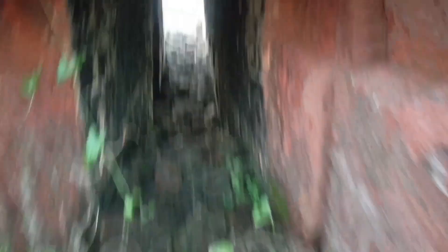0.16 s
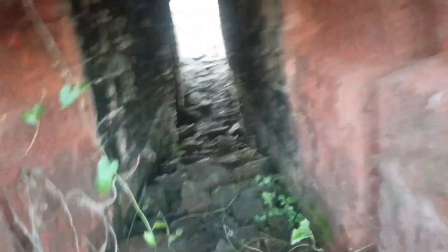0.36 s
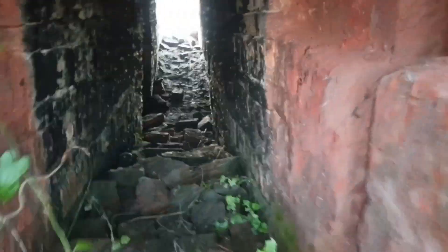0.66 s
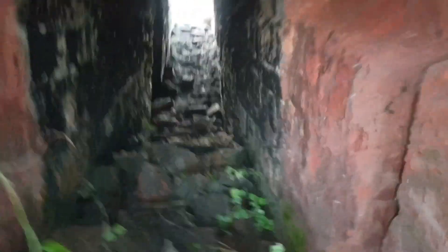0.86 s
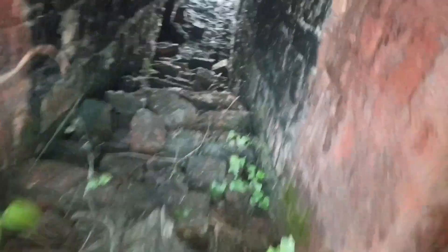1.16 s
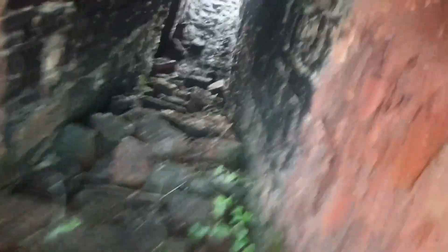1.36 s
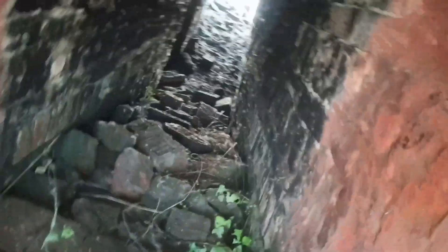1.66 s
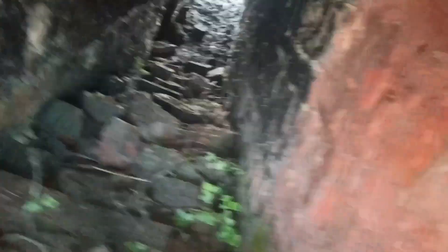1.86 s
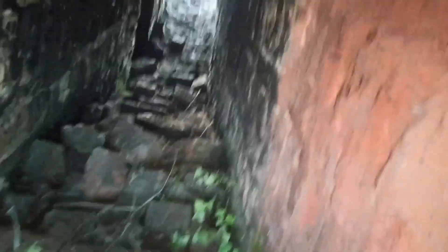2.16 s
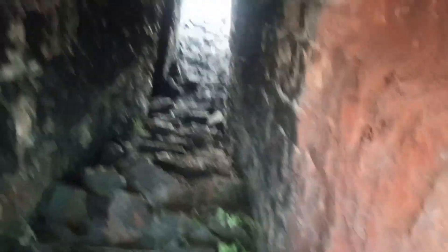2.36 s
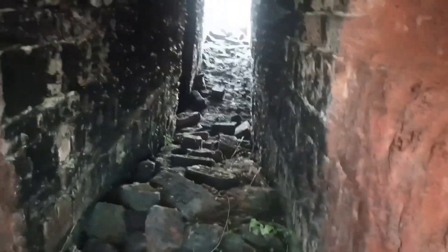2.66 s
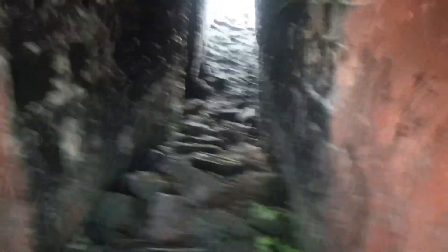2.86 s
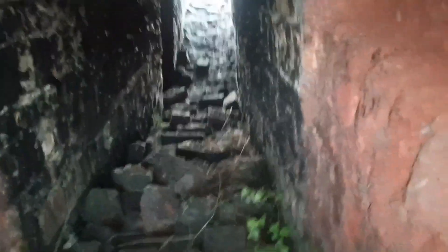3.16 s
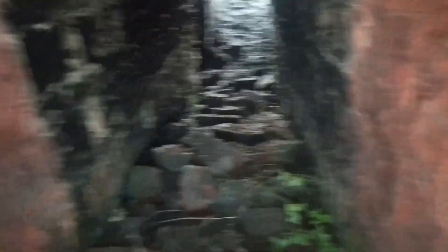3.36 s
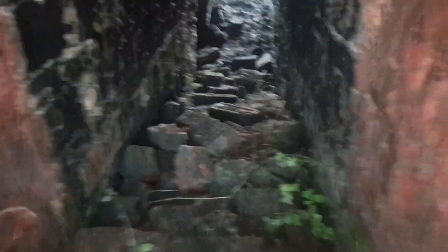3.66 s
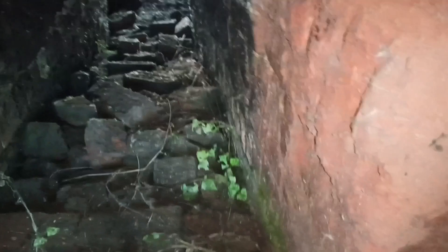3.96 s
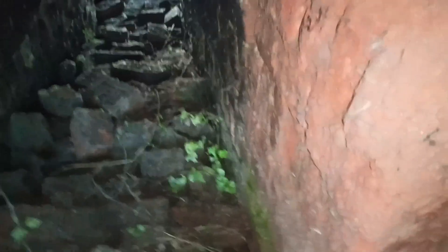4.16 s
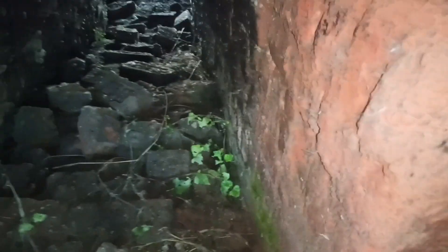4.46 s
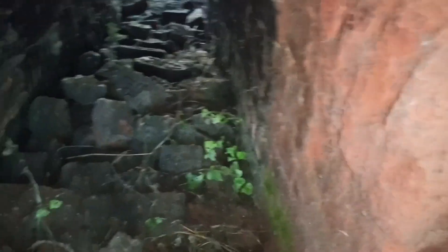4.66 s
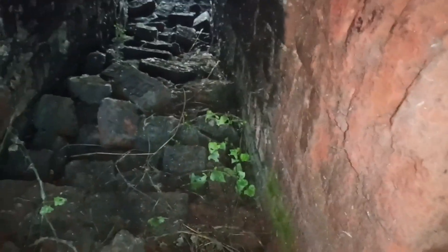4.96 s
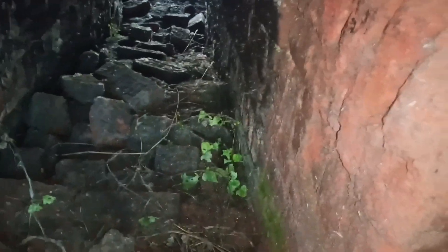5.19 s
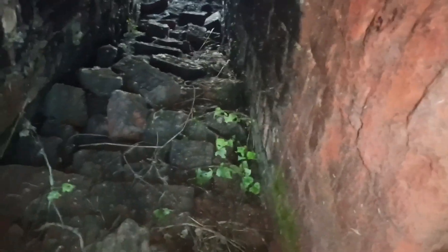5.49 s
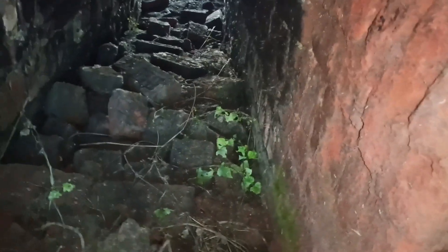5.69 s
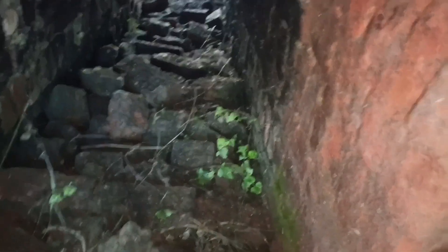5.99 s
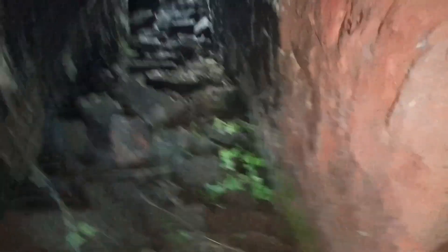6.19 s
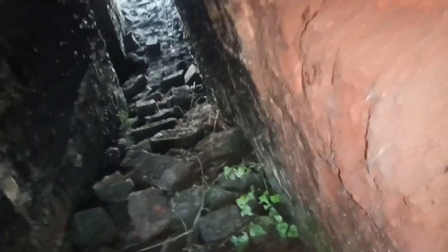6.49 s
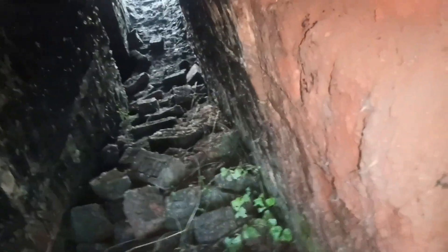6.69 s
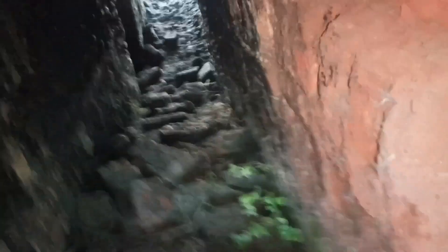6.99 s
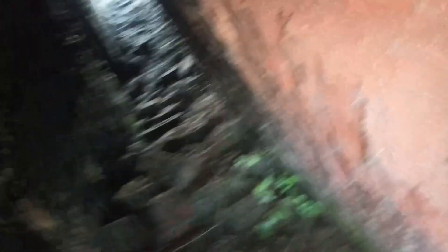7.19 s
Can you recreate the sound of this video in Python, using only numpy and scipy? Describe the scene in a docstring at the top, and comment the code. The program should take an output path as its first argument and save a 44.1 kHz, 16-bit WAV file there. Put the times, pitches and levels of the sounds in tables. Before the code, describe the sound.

Close, dry rustling of stems opens with a very loud bump on the microphone, then drops to near quiet with small ticks and two more knocks. A clacking thud and strong swishes come around three seconds, then steady rustling with many crisp twig snaps. Another cluster of hard knocks rattles the microphone near the end, before a last swelling scrape. Narrow brick and stone passage, handheld microphone, little echo.

```python
"""Squeezing through dry stems

Someone edges through dry stems in a narrow brick passage, holding a camera with one microphone.
Stems drag and rustle as grainy noise and twigs snap as short noise bursts. Something hard knocks
close to the microphone: a swing of pressure and a ringing casing. Thuds and woody knocks sound as
decaying modes. Filtered-noise rumble, shuffle and hiss and a faint wavering hum lie under it all;
a faint airy tone and a brief squeak come later."""
import sys
import numpy as np
from scipy import signal
from scipy.fft import rfft, irfft, next_fast_len
from scipy.io import wavfile
from scipy.ndimage import uniform_filter1d, map_coordinates

SR = 44100
rng = np.random.default_rng(int(sys.argv[2]) if len(sys.argv) > 2 else 0)


def transcribe(signal):
    """Save signal, clipped to [-1, 1], as a 16-bit WAV file at the path in sys.argv[1]."""
    frames = np.atleast_2d(signal).T
    limited = np.clip(frames, -1, 1)
    pcm = np.round(limited * 32767).astype(np.int16)
    wavfile.write(sys.argv[1], SR, pcm)


N = 323694

# Body and ground movement: t/s, rumble level/dB, shuffle level above the rumble/dB
BODY_MOVEMENT = [(0, -56, -6), (0.26, -41.5, -4.5), (0.45, -61, -10), (1.37, -63, -9), (1.74, -73, -7.5),
                 (1.92, -61, -11), (2.29, -58.5, -8.5), (2.76, -46, -3), (3.07, -62.5, -8.5),
                 (3.27, -62, -5), (3.51, -41.5, -6), (3.64, -50.5, -1), (4.09, -52, -9.5),
                 (4.5, -51.5, -3.5), (4.78, -52, -8), (6.11, -54.5, -3), (6.48, -51.5, -7), (6.66, -52, 1),
                 (7.05, -42.5, -5), (7.22, -49.5, 6), (7.34, -38, -2)]
# Noise spectra: f/Hz, level/dB per Hz, relative
RUMBLE_SPECTRUM = [(15, -44), (25, -20.5), (38, -12), (70, 6), (103, -2.5), (180, -9), (230, -34.5),
                   (400, -120)]
SHUFFLE_SPECTRUM = [(110, -35.5), (180, -7), (205, -1.5), (269, -3), (334, -4), (382, -6), (528, -10.5),
                    (729, -7.5), (1000, -16.5), (1300, -47), (2200, -120)]
# Steady hiss of the still air and microphone: f/Hz, level/dB per Hz, relative
AIR_SPECTRUM = [(500, -7.5), (1300, 2.5), (15700, -16.5)]

# Faint hum that swells with the background: t/s, level/dB
HUM_LEVEL = [(0, -87), (1.5, -89), (1.7, -96), (2.6, -79.5), (3.2, -92), (3.6, -72), (7.34, -80.5)]
# Fuzzy lines of the hum: f/Hz, waver/Hz, level above the hum level/dB
HUM_LINES = [(266, 22, 10.5), (374.4, 14, 8), (1103, 4.4, 4)]

# Stems dragged past, one row a stroke: t at full strength/s, rustle level/dB, rise/s, hold/s, fall/s,
# coarse scrape above the rustle/dB, fine fizz above the rustle/dB; rise and fall each span 20 dB
STEM_STROKES = [(0.07, -47.5, .15, 0.073, .2, -4.5, -1.5), (0.231, -35.5, 0.12, 0.0055, 0.091, -2, 0.5),
                (0.37, -52.5, 0.25, 0.013, .1, -6.5, -2), (1.111, -54.5, 0.056, 0.0094, 0.12, -3, -5.5),
                (1.21, -65.5, .02, .06, 0.11, 2, -4), (1.39, -73.5, 0.047, 0.076, .1, 4.5, -3),
                (1.95, -58, 0.12, 0.0087, 0.14, -3, -6), (2.249, -54.5, 0.028, 0.0084, 0.063, -9, -10),
                (2.379, -54, .11, 0.017, 0.21, -3.5, -5), (2.576, -44.5, 0.19, .01, 0.21, -4, -1.5),
                (2.755, -29.5, 0.081, 0.012, 0.041, -5, -2), (2.905, -39.5, .16, 0.008, 0.036, -3, -4),
                (2.965, -52.5, .1, 0.013, 0.025, -3.5, -7), (3.346, -44, 0.11, 0.039, .3, -7.5, -3),
                (3.519, -29, 0.13, .01, 0.14, -5, -3), (3.666, -33.5, 0.24, 0.071, 0.19, -5, -2.5),
                (3.9, -46.5, 0.32, 0.068, 0.1, -2, -3.5), (4.25, -46.5, 0.11, 0.013, 0.021, -1, -10),
                (4.312, -51.5, 0.033, 0.062, .1, -0.5, -4), (4.398, -29.5, 0.053, 0.013, 0.029, -12, -9.5),
                (4.586, -36, 0.13, .04, 0.13, -9.5, -4.5), (4.674, -34, 0.068, 0.036, 0.14, -11.5, -4),
                (4.973, -46, .18, 0.015, 0.24, -7.5, -1), (5.088, -38.5, 0.16, .01, 0.054, -8.5, -2.5),
                (5.16, -39.5, 0.11, 0.0094, 0.12, -6, -1), (5.324, -37.5, 0.13, 0.1, 0.096, -8.5, -0.5),
                (5.793, -40.5, 0.42, .01, 0.51, -5.5, 0.5), (6.06, -35, 0.16, 0.088, .15, -6, -1.5),
                (6.209, -40, .1, 0.0096, 0.079, -5.5, -1.5), (6.425, -39, 0.26, 0.012, 0.38, -7.5, -3.5),
                (6.971, -40, 0.037, 0.027, 0.17, 1.5, -8.5), (7.03, -36.5, 0.085, 0.016, .15, 2.5, -4.5),
                (7.252, -32.5, 0.36, .1, .1, -2, -8)]
# Light contact between the strokes: t/s, rustle level/dB, coarse scrape and fine fizz above it/dB
LIGHT_CONTACT = [(0, -58.5, -6, 3.5), (0.5, -68, 1.5, -1), (0.744, -70, -4.5, 0), (0.872, -64, -4, -2.5),
                 (1.01, -70, -5.5, 0), (1.3, -66, 4.5, -1.5), (1.36, -74.5, 2, -0.5),
                 (1.55, -69, -1.5, -4.5), (1.61, -78, -18, -4), (1.8, -68, -8, -5.5), (2.15, -68, -4, -6),
                 (2.9, -60, -8, 1), (3.16, -78, 2, -9), (3.9, -52.5, -5.5, -7.5), (4.5, -51, -3.5, 0),
                 (4.85, -64, 5, -7), (5.5, -49, -6, 1), (6.3, -55.5, -3.5, -23), (6.75, -56.5, 3, 0),
                 (7.34, -52, 2, -5)]
# Twig snaps: t/s, level/dB, thinness/dB (thin twigs lose wood and gain fizz)
TWIG_SNAPS = [(0.0185, -41, -9.5), (0.214, -38, 8), (0.348, -36.5, 6), (0.3956, -36.5, -0.5),
              (0.4774, -63, -9), (0.5444, -51.5, -1), (0.9385, -52, 1), (1.0267, -58, 10),
              (1.0935, -34, -6), (1.129, -58, -1), (1.206, -60, -13.5), (1.323, -55, 6), (1.6327, -59.5, 5),
              (1.708, -60.5, -3), (1.783, -54.5, -3), (1.942, -45, -1), (1.999, -42.5, 2), (2.0178, -51, 0),
              (2.103, -48, 2.5), (2.144, -48.5, -1), (2.8636, -41, -12), (2.8978, -29, -2),
              (2.9156, -27.5, 4), (3.151, -54.5, -2), (3.735, -20.5, -5), (3.986, -26, -2.5),
              (4.0326, -31.5, -2), (4.169, -36, -3), (4.293, -31, 1), (4.315, -33, 4), (4.399, -28.5, 6),
              (4.5716, -22.5, 8.5), (4.5472, -34.5, 8.5), (4.595, -28.5, 8), (4.8989, -36.5, 6),
              (4.9813, -29, 4.5), (5.0975, -36.5, -13), (5.1405, -28.5, 10), (5.1605, -24.5, 3.5),
              (5.314, -27.5, 2), (5.413, -21, 5), (5.623, -34.5, 15), (5.7524, -29, 11.5),
              (6.0502, -27.5, 4), (6.195, -24.5, 6.5), (6.378, -31.5, 4), (6.6081, -38, 1),
              (6.718, -36, -5), (6.7353, -39.5, 3.5), (6.756, -33.5, -10.5), (6.788, -38, 9),
              (6.793, -37.5, 15), (6.8513, -42, -12), (6.984, -49, -15), (7.032, -36, -14), (7.246, -28, 0)]
# Spectra of the three stem sizes: f/Hz, level/dB per Hz, relative
RUSTLE_SPECTRUM = [(2120, -37.5), (3600, -16.5), (4160, -13.5), (5130, -7.5), (5570, -2.5), (6000, -2),
                   (7210, -7), (9200, -17.5), (12000, -37.5), (20200, -120)]
SCRAPE_SPECTRUM = [(530, -40), (900, -14.5), (1250, -10.5), (1430, -11), (1530, -8.5), (1830, -4.5),
                   (2050, -3), (3100, -9.5), (3600, -12), (4680, -3.5), (7920, -120)]
FIZZ_SPECTRUM = [(5410, -34.5), (9200, -8.5), (10200, -5.5), (11300, 3.5), (12400, 3), (13500, 4),
                 (15700, -2)]
SNAP_RISE_S, SNAP_T60_S = 0.00078, .032
WOOD_DB, FINE_DB = -4.5, -6.5  # woody and fine parts of a snap above its rustle, before thinness

# Hard knocks: t/s, swing level/dB, swing f/Hz, click level/dB, click brightness/dB per octave
HARD_KNOCKS = [(0.376, -55, 900, -36, -1.5), (0.3802, -3, 527, -14, -0.5), (1.2849, -12.5, 569, -24, -8),
               (1.4995, -14.5, 560, -26, -8.5), (1.513, -25, 500, -61, -18), (2.3325, -29.5, 470, -45.5, 2),
               (2.339, -19, 443, -52.5, -12), (2.8438, -44, 900, -26.5, -2.5), (2.9569, -43, 795, -32.5, 0),
               (3.0883, -54, 705, -57.5, -11), (6.644, -14, 560, -11.5, 0), (6.6486, -12, 367, -26.5, -4.5),
               (6.686, -37, 680, -31, -6), (6.711, -32, 676, -24.5, -2.5), (6.7418, -46, 800, -22, 0.5),
               (6.7982, -17, 315, -27, -4), (6.8357, -54, 787, -31, 1.5), (6.8477, -58, 793, -31, 0.5),
               (6.8603, -62, 800, -33, -3)]
# Modes of the casing: f/Hz, level/dB, t60/s
CASING_MODES = [(1750, 5.5, 0.0027), (2920, 9, 0.0028), (3600, -7, 0.00294), (6550, 5.5, 0.0028),
                (10000, -3.5, 0.0039), (13300, 4.5, 0.0026)]
CASING_DETUNE = .03  # spread of mode pitch from knock to knock, as a fraction
CLICK_RISE_S, REBOUND_T60_S = .00015, .026

# Thuds and woody knocks, dull boom and clacking ring:
# t/s, boom level/dB, clack level/dB, hardness/dB per octave, boom t60/s
THUDS_AND_WOODY_KNOCKS = [(1.125, -55, -43.5, 5, 0.12), (1.887, -43, -74, -10, 0.11),
                          (1.922, -45.5, -56.5, -16, 0.063), (2.235, -49, -56, -14, 0.093),
                          (2.527, -49.5, -55, 1, 0.13), (2.86, -14.5, -16.5, -6, 0.086),
                          (2.917, -34.5, -45, -8, 0.094), (3.064, -46.5, -55, 4.5, 0.066),
                          (3.47, -37.5, -48, -5, 0.062), (3.565, -34, -47.0, -8, 0.04),
                          (3.737, -35, -28.5, 15, 0.081), (3.838, -28, -44.5, -18, 0.072),
                          (4.137, -56, -70, -3, 0.15), (4.571, -29, -23, 15, 0.049),
                          (5.098, -36, -30.5, 13, 0.047), (6.652, -45, -50, -1, .3),
                          (6.992, -38.5, -30, -4.5, 0.047), (7.18, -33, -35, -4, 0.055),
                          (7.247, -30, -34, -3, 0.097)]
# Modes of the dull boom: f/Hz, level/dB
BOOM_MODES = [(108, 8), (163, 5), (275, 1.5)]
# Modes of the clacking ring: f/Hz, level/dB
CLACK_MODES = [(415, 0.5), (570, 2.5), (790, 5), (1100, -2), (1550, -6), (2100, -8.5)]
STRIKE_DETUNE = .025  # spread of boom and clack pitch from strike to strike, as a fraction

# Faint airy tone that wavers: t/s, f/Hz, level/dB
AIRY_TONE = [(3.95, 800, -82.5), (4.3, 800, -58), (4.45, 760, -73), (4.62, 786, -57), (4.75, 722, -61),
             (5.0, 745, -71), (5.22, 707, -63.5), (5.5, 744, -61), (5.7, 740, -92)]
# A stem squeaks as it slides: t/s, f/Hz, level/dB
STEM_SQUEAK = [(4.66, 5600, -98), (4.69, 5463, -44), (4.71, 5460, -33.5), (4.725, 5470, -43),
               (4.75, 5620, -43), (4.78, 5600, -75)]

BAND_LIMIT_HZ, BASS_CORNER_HZ = 15750, 45


def amp(db):
    """dB to gain."""
    return 10 ** (np.asarray(db) / 20)


def unit(x):
    """x at rms 1."""
    return x / np.sqrt(np.mean(x ** 2, axis=-1, keepdims=True) + 1e-20)


def curves(rows):
    """One value per sample for each column after the time."""
    times, *columns = np.transpose(rows)
    return [np.interp(np.arange(N) / SR, times, column) for column in columns]


def wobble(rate):
    """A smooth random curve, rate knots a second."""
    knots = rng.standard_normal(int(N * rate / SR) + 4)
    return map_coordinates(knots, [np.arange(N) * rate / SR])


def filtered(x, response):
    """x times a response of frequency."""
    size = next_fast_len(N + SR // 2)
    spectrum = rfft(x, size) * response(np.fft.rfftfreq(size, 1 / SR))
    return irfft(spectrum, size)[..., :N]


def coloured(x, points):
    """x through a spectrum of (f/Hz, level/dB) points, at rms 1."""
    hz, db = np.transpose(points)

    def response(f):
        return amp(np.interp(np.log(f + 1), np.log(hz), db, left=-120, right=-120))
    return unit(filtered(x, response))


def patchy(patchy_db):
    """Noise whose level varies in narrow patches of frequency that last a few hundredths of a second."""
    bins = signal.stft(rng.standard_normal(N), nperseg=512)[2]
    field = uniform_filter1d(rng.standard_normal(bins.shape), size=3, axis=0)  # across frequency
    field = uniform_filter1d(field, size=6, axis=1)  # along time
    return signal.istft(bins * amp(patchy_db * field / field.std()), nperseg=512)[1][:N]


def add(track, s, sound):
    """Lay a sound into a track at s seconds."""
    part = track[round(s * SR):][:len(sound)]
    part += sound[:len(part)]


def decay(t, t60, rise):
    """A strike's envelope: a quick exponential rise, then a fall of 60 dB in t60 seconds."""
    return amp(-60 * t / t60) * (1 - np.exp(-t / rise))


def fuzzy(pitch_hz, waver_hz, rate):
    """A tone of rms 1 whose pitch and strength waver at random."""
    phase = 2 * np.pi * np.cumsum(pitch_hz + waver_hz * wobble(rate)) / SR
    return unit(amp(3.5 * wobble(rate)) * np.sin(phase))


def voiced(rows, waver_hz, rate):
    """A fuzzy tone along (t/s, f/Hz, level/dB) rows, silent before and after them."""
    hz, db = curves(rows)
    t = np.arange(N) / SR
    sounding = (t > rows[0][0]) * (t < rows[-1][0])
    return sounding * amp(db) * fuzzy(hz, waver_hz, rate)


def ground():
    """Rumble and dull shuffle of the moving body, as shaped noise over a steady hiss."""
    rumble_db, shuffle_db = curves(BODY_MOVEMENT)
    rumble = amp(rumble_db + 1.2 * wobble(16)) * coloured(rng.standard_normal(N), RUMBLE_SPECTRUM)
    shuffle_level = amp(rumble_db + shuffle_db + 0.83 * wobble(30))
    shuffle = shuffle_level * coloured(patchy(patchy_db=3.5), SHUFFLE_SPECTRUM)
    hiss = amp(-78.0) * coloured(rng.standard_normal(N), AIR_SPECTRUM)
    return rumble + shuffle + hiss


def hum():
    """A few fuzzy lines that swell together."""
    lines = sum(amp(db) * fuzzy(hz, waver_hz, 13) for hz, waver_hz, db in HUM_LINES)
    return amp(curves(HUM_LEVEL)[0]) * lines


def strokes():
    """Power of rustle, scrape and fizz: each stroke rises, holds and falls over the light contact."""
    t = np.arange(N) / SR
    level_db, coarse_db, fine_db = curves(LIGHT_CONTACT)
    power = amp(level_db + np.array([0 * t, coarse_db, fine_db])) ** 2
    for s, db, rise, hold, fall, coarse, fine in STEM_STROKES:
        shape_db = -20 * (np.maximum(s - t, 0) / rise + np.maximum(t - s - hold, 0) / fall)
        power = power + amp(db + shape_db) ** 2 * amp([[0], [coarse], [fine]]) ** 2
    return power


def grains():
    """Countless tiny slips: random bursts of a few ms, in clumps over a steady floor."""
    slip_level = amp(np.minimum(6.1 * rng.exponential(size=N), 11))
    slips = (rng.random(N) < 300 / SR) * slip_level  # about 300 a second
    burst = decay(np.arange(SR // 50) / SR, 0.013, 0.00064)
    burst_power = np.abs(signal.fftconvolve(slips ** 2, burst ** 2)[:N])
    clumps = amp(1.57 * wobble(60) + 0.32 * wobble(25))
    return unit(np.sqrt(1 + 0.35 * burst_power) * clumps)


def stems():
    """Grainy strokes and clear twig snaps drive patchy noise in three size classes."""
    power = strokes() * grains() ** 2
    crack = decay(np.arange(SR // 10) / SR, SNAP_T60_S, SNAP_RISE_S)
    for s, db, thin_db in TWIG_SNAPS:
        part_levels = [0, WOOD_DB - thin_db, FINE_DB + thin_db]
        for track, part_db in zip(power, part_levels):
            add(track, s, (amp(db + part_db) * crack) ** 2)
    spectra = [RUSTLE_SPECTRUM, SCRAPE_SPECTRUM, FIZZ_SPECTRUM]
    return sum(np.sqrt(p) * coloured(patchy(patchy_db=2.5), spectrum)
               for p, spectrum in zip(power, spectra))


def hard_knocks():
    """One swing of pressure with a slow rebound; the casing's modes click near the crest."""
    out, t = np.zeros(N), np.arange(SR // 10) / SR
    detunes = rng.standard_normal((len(HARD_KNOCKS), len(CASING_MODES)))
    for (s, db, hz, click_db, bright_db), detune in zip(HARD_KNOCKS, detunes):
        cycle = t * hz - .5  # counted from the middle of the swing
        swing = -np.sin(2 * np.pi * cycle) * np.exp(-(cycle / 0.42) ** 2)
        after = np.maximum(t - 1 / hz, 0)
        rebound = .35 * np.sin(np.pi * (after / .0045) ** 0.81)  # each half-swing is slower
        rebound = rebound * amp(-60 * after / REBOUND_T60_S)
        add(out, s - 0.4 / hz, amp(db) * (swing + rebound))
        for (mode_hz, mode_db, t60), d in zip(CASING_MODES, detune):
            level_db = click_db + mode_db + bright_db * np.log2(mode_hz / 4500)
            ring = np.sin(2 * np.pi * mode_hz * (1 + CASING_DETUNE * d) * t)
            add(out, s - .0003, amp(level_db) * decay(t, t60, CLICK_RISE_S) * ring)
    return out


def thuds_and_woody_knocks():
    """Each strike sums a dull boom and a shorter clacking ring, brighter the harder the contact."""
    out, t = np.zeros(N), np.arange(SR // 3) / SR
    chances = rng.standard_normal((len(THUDS_AND_WOODY_KNOCKS), len(BOOM_MODES + CLACK_MODES)))
    for (s, boom_db, clack_db, hard_db, t60), chance in zip(THUDS_AND_WOODY_KNOCKS, chances):
        modes = [(hz, boom_db + db, t60, .003) for hz, db in BOOM_MODES]
        modes += [(hz, clack_db + db + hard_db * np.log2(hz / 800), 0.37 * t60, .002)
                  for hz, db in CLACK_MODES]
        for (hz, db, mode_t60, rise), c in zip(modes, chance):
            ring = np.sin(2 * np.pi * hz * (1 + STRIKE_DETUNE * c) * t)
            add(out, s, amp(db) * decay(t, mode_t60, rise) * ring)
    return out * amp(2.2 * wobble(250))  # fast random flicker roughens the ring


def airy_tone():
    """A faint sine whose pitch and strength waver along its drawn curve."""
    return voiced(AIRY_TONE, waver_hz=39.8, rate=60)


def squeak():
    """A sliding stem sounds as one brief, high, wavering sine."""
    return voiced(STEM_SQUEAK, waver_hz=70, rate=120)


def scene():
    """One microphone feeds both channels."""
    touches = stems() + hard_knocks() + thuds_and_woody_knocks() + squeak()
    mono = ground() + hum() + touches + airy_tone()
    return np.tile(mono, (2, 1))


def record(dry):
    """The microphone loses the deepest bass; the camera keeps nothing above its band limit."""
    def response(hz):
        bass_cut = (1j * hz / (1j * hz + BASS_CORNER_HZ)) ** 4
        return bass_cut * (hz < BAND_LIMIT_HZ)
    return filtered(dry, response)


dry = scene()
out = record(dry)
transcribe(out)
```